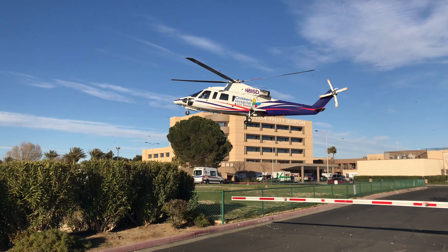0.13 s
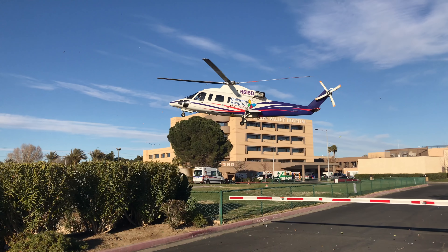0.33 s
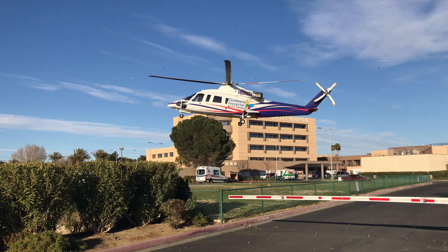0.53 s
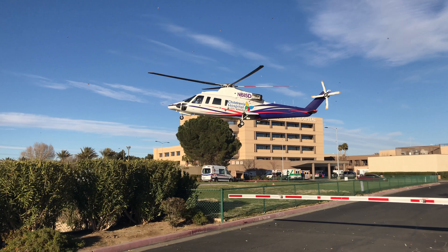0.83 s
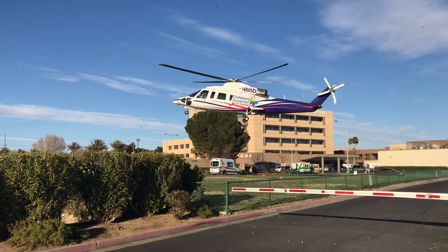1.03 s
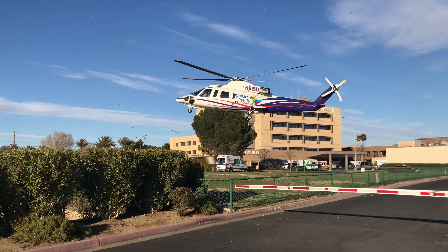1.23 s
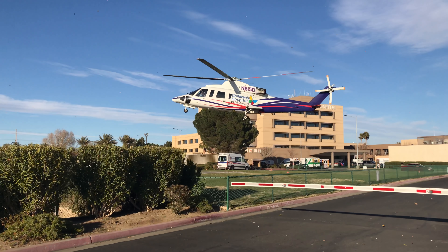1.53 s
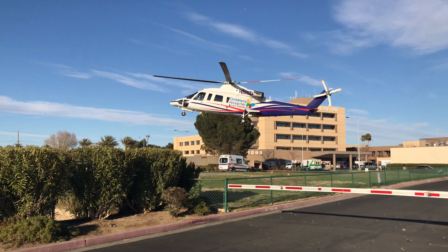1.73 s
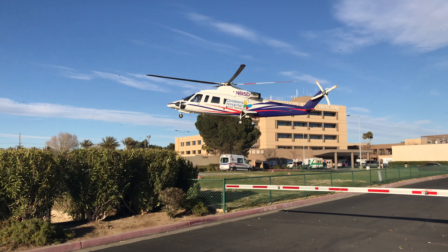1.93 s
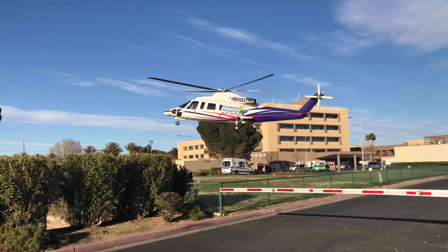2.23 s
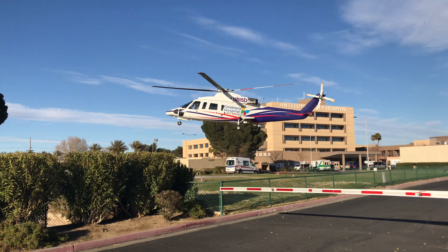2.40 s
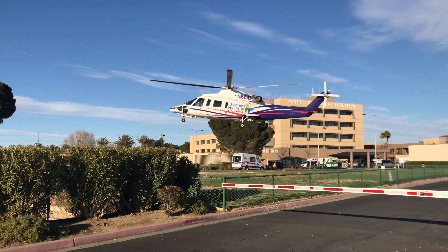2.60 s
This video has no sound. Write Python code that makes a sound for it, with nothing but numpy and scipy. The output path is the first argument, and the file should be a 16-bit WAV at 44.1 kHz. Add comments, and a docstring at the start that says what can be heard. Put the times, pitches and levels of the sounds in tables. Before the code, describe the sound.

A helicopter hovers low with roaring, whining engines and thumping blades, briefly cutting out.

```python
"""Helicopter hovering low in front of buildings

One microphone, in reach of reflections from road and walls. The turbines roar and whine; the tail rotor
hums and burbles as it chops the main rotor's tip vortices; the main rotor thumps, swishes and at times
slaps. The sound cuts out for a quarter second and returns louder, briefly overloading the microphone."""
import sys
import numpy as np
from scipy import signal
from scipy.fft import rfft, irfft, next_fast_len
from scipy.io import wavfile
from scipy.ndimage import uniform_filter1d

SR = 44100
rng = np.random.default_rng(int(sys.argv[2]) if len(sys.argv) > 2 else 0)


def to_wav(sig):
    """Store sig (one row per channel, or 1-D mono) as 16-bit WAV at the path in sys.argv[1].

    Samples outside -1..1 are clipped; the rate is SR.
    """
    pcm = np.clip(np.atleast_2d(sig), -1, 1) * 32767
    pcm = np.round(pcm).astype(np.int16)
    wavfile.write(sys.argv[1], SR, pcm.T)  # frames by channels


N = 121716
TIME_S = np.arange(N) / SR
MAIN_HZ, TAIL_HZ = 20.78, 114.4  # blade passes per second
FIRST_BLADE_S = .045
BLADES_PASSED = (TIME_S - FIRST_BLADE_S) * MAIN_HZ


def amp(db):
    """Decibels to gain."""
    return 10 ** (np.asarray(db) / 20)


def unit(x):
    """Scales to rms 1."""
    return x / np.sqrt(np.mean(x ** 2) + 1e-20)


def follow(rows):
    """Joins timed rows by straight lines: one curve for each column after the time."""
    times, *columns = np.transpose(rows)
    return [np.interp(TIME_S, times, column) for column in columns]


def colour(x, spectrum):
    """Causal filter through the points freq_hz, gain_db."""
    size = next_fast_len(N + 4096)
    size += size % 2
    hz, db = np.transpose(spectrum)
    bin_hz = abs(np.fft.fftfreq(size, 1 / SR)) + 1
    log_gain = np.log(amp(np.interp(np.log(bin_hz), np.log(hz), db)))
    minimum_phase = np.exp(np.conj(signal.hilbert(log_gain)))
    return np.fft.ifft(np.fft.fft(x, size) * minimum_phase).real[:N]


def wander(hz):
    """Smooth random curve of rms 1, moving at rates up to about hz."""
    f = np.fft.rfftfreq(N, 1 / SR)
    return unit(irfft(rfft(rng.standard_normal(N)) * np.exp(-(f / hz) ** 2) * (f > 0), N))


def resonate(x, hz, width_hz):
    """A resonance whose centre follows the curve hz."""
    carrier = np.exp(2j * np.pi * np.cumsum(hz) / SR)
    pole = np.exp(-np.pi * width_hz / SR)
    return 2 * (carrier * signal.lfilter([1 - pole], [1, -pole], x / carrier)).real


def reflections(x):
    """Road and walls send delayed, weaker copies to the microphone."""
    # delay_s, gain_db
    echoes = [(.031, -19.5), (.073, -17), (.118, -19)]
    return sum(amp(db) * np.pad(x, (round(delay_s * SR), 0))[:N] for delay_s, db in echoes)


def downwash(x, depth_db, below_hz):
    """The downwash bends the sound paths: patches of the lows and midrange swell and fade."""
    hz, _, spectra = signal.stft(x, SR, nperseg=1024, noverlap=768)
    slow_noise = uniform_filter1d(rng.standard_normal(spectra.T.shape), size=16, axis=0)
    patches = unit(uniform_filter1d(slow_noise, size=5, axis=1)).T
    swing_db = depth_db / (1 + (hz[:, None] / below_hz) ** 2)
    return signal.istft(spectra * amp(swing_db * patches), SR, nperseg=1024, noverlap=768)[1][:N]


def turbine_whine(skirt_db, core_hz, skirt_hz):
    """The compressor's tone, smeared by turbulent air into a narrow core and a wide skirt."""
    # compressor tone: time_s, pitch_hz
    pitch = [(0, 9300), (.45, 9275), (.75, 9275), (.95, 9330), (1.25, 9300), (1.5, 9335), (1.92, 9340),
             (2.2, 9385), (2.76, 9375)]
    # its strength: time_s, level_db
    levels = [(0, -33), (.3, -38.5), (.8, -40), (1.2, -38.5), (1.6, -41), (1.92, -42), (2.19, -33),
              (2.35, -35), (2.76, -38)]
    carrier = np.exp(2j * np.pi * np.cumsum(follow(pitch)[0]) / SR)
    core, skirt = (wander(hz) + 1j * wander(hz) for hz in (core_hz, skirt_hz))
    return (carrier * (core + amp(skirt_db) * skirt)).real * amp(follow(levels)[0])


def rush():
    """Exhaust roar, blade rasp and hiss, fluttering with both rotors and with the turbulent air."""
    # levels ahead of the trims in the mix: time_s, roar_db, rasp_db, hiss_db
    levels = [(0, -19, -20, -26.5), (.15, -18, -17.5, -27), (.3, -18.5, -17, -27), (.43, -24.5, -22, -27.5),
              (.55, -23.5, -18, -27), (.77, -23, -21.5, -26), (.92, -18, -17.5, -24.5),
              (1.1, -21.5, -21.5, -26.5), (1.28, -21.5, -19, -24.5), (1.42, -21, -24, -27),
              (1.58, -20.5, -24.5, -26.5), (1.72, -21, -20, -26), (1.93, -21, -23, -26.5),
              (2.18, -12.5, -13, -17.5), (2.24, -17.5, -16, -20), (2.32, -20.5, -18, -22.5),
              (2.43, -19, -17, -22), (2.52, -20.5, -34, -24.5), (2.62, -22, -28, -30.5),
              (2.76, -21.5, -21, -23.5)]
    # spectra of the three noises: freq_hz, gain_db
    roar_colour = [(25, -48.5), (50, -25.5), (90, -5.5), (140, -1.5), (180, -5), (250, -1), (340, -0.5),
                   (440, -3.5), (620, 3.5), (800, -2.5), (1100, -15), (2500, -36.5)]
    rasp_colour = [(100, -39.5), (600, -19.5), (1000, 0.5), (1250, -1.5), (1700, -4), (2400, -15),
                   (4000, -32), (9000, -50)]
    hiss_colour = [(600, -9.5), (1500, 0.5), (2400, 1), (3100, 1.5), (4600, -2.5), (5000, -5), (5700, -4.5),
                   (6900, -6), (7600, -10.5), (8800, -9), (9900, -10), (10500, -17), (11400, -13.5),
                   (14000, -19), (17200, -22.5)]
    roar_db, rasp_db, hiss_db = follow(levels)
    main = np.cos(2 * np.pi * BLADES_PASSED)
    tail = np.cos(2 * np.pi * TAIL_HZ * TIME_S)
    gusts = wander(77)
    roar = colour(rng.standard_normal(N), roar_colour) * amp(.33 * main + .56 * tail + 2 * gusts)
    grit = rng.standard_normal(N) * amp(.77 * wander(490))
    rasp = colour(grit, rasp_colour) * amp(.3 * main + 1.3 * tail + gusts)
    hiss = colour(rng.standard_normal(N), hiss_colour)
    hiss *= amp(.4 * main + .28 * tail + gusts + .51 * wander(500))
    return unit(roar) * amp(roar_db) + unit(rasp) * amp(rasp_db - 1.5) + unit(hiss) * amp(hiss_db + 1)


def rotor_tones(hum_trim_db, octave_db):
    """Tail rotor hum with its octave, and a drone at twice the tail rate plus the main rate."""
    # tone levels, the hum ahead of its trim: time_s, hum_db, drone_db
    levels = [(0, -24.5, -18.5), (.1, -24, -21.5), (.32, -27, -17.5), (.43, -27, -29.5), (.5, -28, -20),
              (.62, -31, -22), (.77, -35, -21.5), (.84, -25, -26), (.92, -30, -18), (1.0, -24.5, -18.5),
              (1.13, -29.5, -17), (1.24, -28.5, -24), (1.32, -29, -19), (1.5, -26, -16.5),
              (1.62, -27, -19.5), (1.93, -27, -20), (2.19, -13.5, -15), (2.32, -20.5, -21),
              (2.5, -20.5, -23), (2.76, -23, -36)]
    hum_db, drone_db = follow(levels)
    tail_cycles = TAIL_HZ * TIME_S + .035 * wander(2.4)
    hum = np.sin(2 * np.pi * tail_cycles) * amp(hum_db + hum_trim_db + wander(2.8))
    octave = np.sin(4 * np.pi * tail_cycles) * amp(octave_db + 4.2 * wander(8))
    drone_cycles = 2 * tail_cycles + BLADES_PASSED + .04 * wander(19)
    drone = np.sin(2 * np.pi * drone_cycles) * amp(drone_db + 1.8 * wander(14))
    return np.sqrt(2) * (hum + octave + drone)


def tail_burble(life_s=.02, drift=.068, scatter_s=.00028, jitter_s=.00008, ring_db=-1.5):
    """Each tip vortex drifts through the tail rotor, cut by several blades in turn: a run of cracks."""
    # strength and ring of the cracks: time_s, level_db, ring_hz
    chop = [(0, -27.5, 1150), (.33, -25.5, 1400), (.57, -23.5, 1150), (.82, -29, 1100), (.9, -18, 1050),
            (.98, -22, 980), (1.15, -18.5, 800), (1.32, -21.5, 720), (1.45, -26, 680), (1.6, -25.5, 640),
            (1.72, -20.5, 750), (1.84, -19.5, 980), (1.93, -26.5, 1000), (2.2, -20.5, 1100),
            (2.43, -20.5, 1250), (2.76, -27.5, 1000)]
    # spectrum of one crack: freq_hz, gain_db
    chop_colour = [(60, -41), (150, -20), (240, -5), (350, -2.5), (460, -5.5), (620, 0), (800, -1.5),
                   (1050, -2.5), (1600, -5), (2600, -8.5), (5000, -20.5), (16000, -34.5)]
    level_db, ring_hz = follow(chop)
    cut_s, vortex_s = np.meshgrid(np.arange(0, N / SR, 1 / TAIL_HZ),
                                  np.arange(FIRST_BLADE_S - 1 / MAIN_HZ, N / SR, 1 / MAIN_HZ))
    age_s = cut_s - vortex_s
    vortex_lag, vortex_vigour = rng.standard_normal((2, len(cut_s), 1))
    cut_lag, cut_vigour = rng.standard_normal((2,) + cut_s.shape)
    crack_s = cut_s - drift * age_s + scatter_s * vortex_lag + jitter_s * cut_lag
    at = np.round(crack_s * SR).astype(int)
    strength = np.exp(-.5 * (age_s / life_s) ** 2) * amp(2 * vortex_vigour + 3 * cut_vigour)
    impulses = np.bincount(np.clip(at, 0, N).ravel(), (strength * (at > 0)).ravel(), N + 1)[:N]
    cracks = colour(impulses, chop_colour)
    ring = resonate(cracks, ring_hz, width_hz=400)
    return unit(unit(cracks) + amp(ring_db) * unit(ring)) * amp(level_db)


def main_thump():
    """The passing main blades pulse the air: low harmonics of the blade rate."""
    # strength of the thump: time_s, level_db
    levels = [(0, -33), (.5, -30.5), (1.9, -34), (2.2, -18), (2.4, -21.5), (2.76, -24.5)]
    # its harmonics: blade_rate_multiple, relative_db
    harmonics = [(2, 2.5), (3, 6), (4, 2), (5, 0.5), (6, 6), (7, 4), (8, 1.5), (9, 0), (10, 5.5), (11, -32),
                 (13, -16.5)]
    cycles = BLADES_PASSED + .025 * wander(5.8) - .5
    wave = sum(amp(db) * np.cos(2 * np.pi * (multiple * cycles + .13 * rng.standard_normal()))
               for multiple, db in harmonics)
    return unit(wave) * amp(follow(levels)[0])


def blade_bursts(soft_db=-21.5, rise_s=.0016, fall_s=.0046):
    """Short bursts of dull and bright noise: main blade slaps, mostly soft, and one tail rotor crack."""
    # Single main blade slaps; the row at 1.137 s is one loud, low crack of the tail rotor chopping
    # a vortex, between the main blade slaps: peak_s, level_db, bright_share (0-1)
    bursts = [(0.238, -16.5, 0.22), (.285, -16.5, 0.15), (.332, -23, 0), (.576, -22.5, 0), (.815, -25, 0.8),
              (1.137, -11, .03), (2.205, -14, 0.6), (2.257, -12, 0.1), (2.311, -21, 0.1), (2.357, -30, .3),
              (2.403, -7, 0), (2.452, -9.5, 0.17), (2.501, -15, 0), (2.549, -7.5, 0.4), (2.596, -9.5, 0.09),
              (2.646, -11, 0.26), (2.694, -9.5, .4), (2.738, -4.5, 0)]
    # spectra of the dull and the bright part: freq_hz, gain_db
    dull_colour = [(100, -20), (300, -2.5), (600, -6.5), (1100, -1), (1800, -11), (3200, -17),
                   (5000, -29.5), (16000, -43.5)]
    bright_colour = [(200, -14), (800, 3.5), (2800, 2.5), (4500, -6), (7000, -8), (10000, -16.5),
                     (16000, -29.5)]
    dull, bright = (unit(colour(rng.standard_normal(N) * amp(4.5 * wander(1000)), spectrum))
                    for spectrum in (dull_colour, bright_colour))
    soft_slaps = [(peak_s, soft_db - .5 * rng.standard_normal(), .25)
                  for peak_s in np.arange(FIRST_BLADE_S, N / SR, 1 / MAIN_HZ)]
    out = np.zeros(N)
    for peak_s, level_db, bright_share in bursts + soft_slaps:
        near = abs(TIME_S - peak_s) < 1 / MAIN_HZ
        age_s = TIME_S[near] - peak_s
        envelope = np.exp(-.5 * (age_s / np.where(age_s < 0, rise_s, fall_s)) ** 2)
        noise = np.sqrt(1 - bright_share) * dull[near] + np.sqrt(bright_share) * bright[near]
        out[near] += amp(level_db) * envelope * noise
    return out


def scene():
    """The helicopter at the microphone, in mono; only slaps and cracks echo off road and walls."""
    sharp = blade_bursts() + tail_burble()
    wash = downwash(rush() + reflections(sharp), depth_db=1.98, below_hz=3100)
    thump = main_thump()
    tones = rotor_tones(hum_trim_db=1.5, octave_db=-30.5)
    whine = turbine_whine(skirt_db=-4, core_hz=90, skirt_hz=400)
    return (sharp + wash + thump + tones + whine)[None]


def record(dry):
    """The sound cuts out and returns, peaks overload the microphone, and the top treble is cut off."""
    silent_from_s, silent_to_s, edge_hz = 1.933, 2.1745, 17230
    live = (TIME_S < silent_from_s) | (TIME_S > silent_to_s)
    gated = dry * uniform_filter1d(live.astype(float), size=24)
    soft_clipped = gated / (1 + gated ** 8) ** (1 / 8)
    lowpass = signal.firwin(1023, edge_hz, window=("kaiser", 9), fs=SR)
    return signal.oaconvolve(soft_clipped, lowpass[None], "same")


dry = scene()
out = record(dry)
to_wav(out)
```